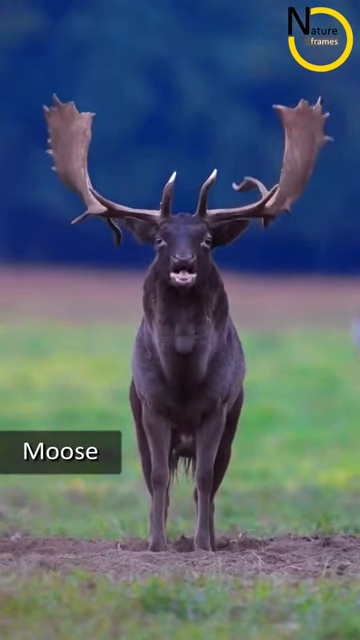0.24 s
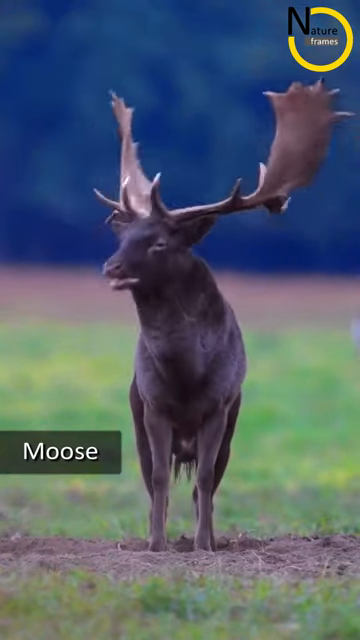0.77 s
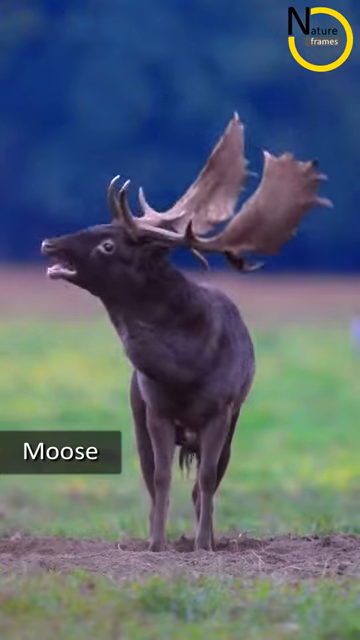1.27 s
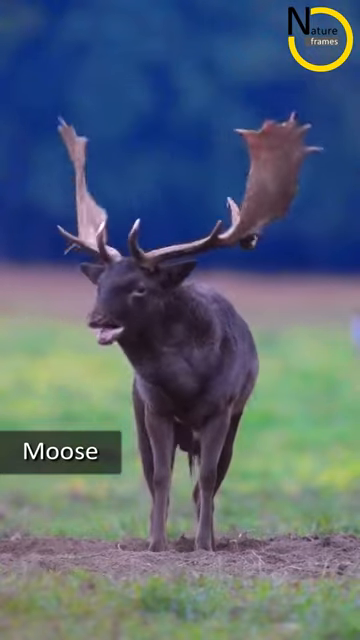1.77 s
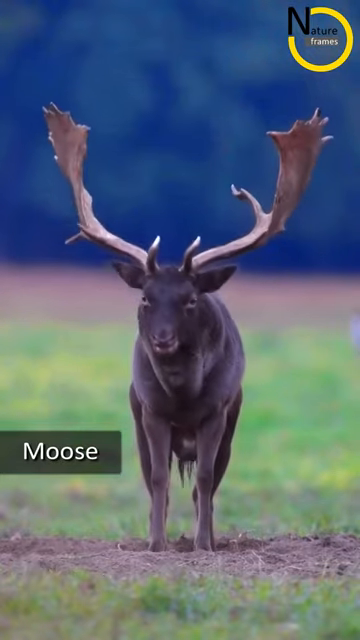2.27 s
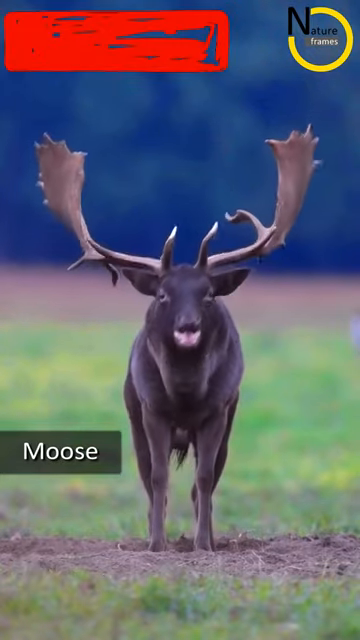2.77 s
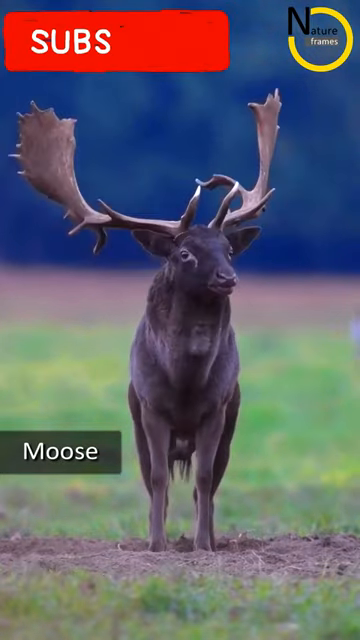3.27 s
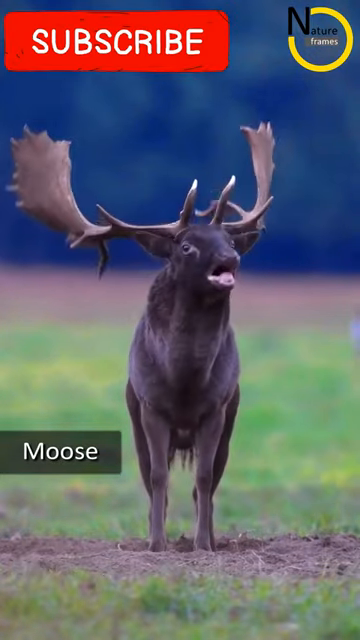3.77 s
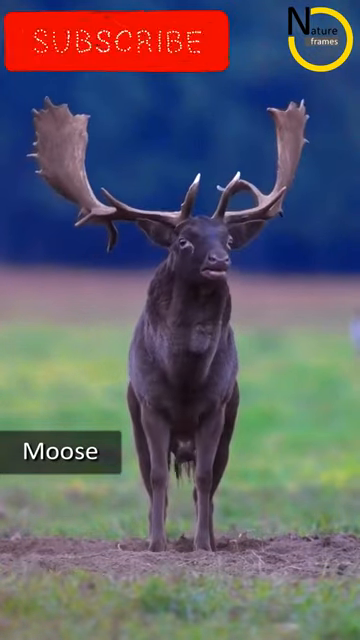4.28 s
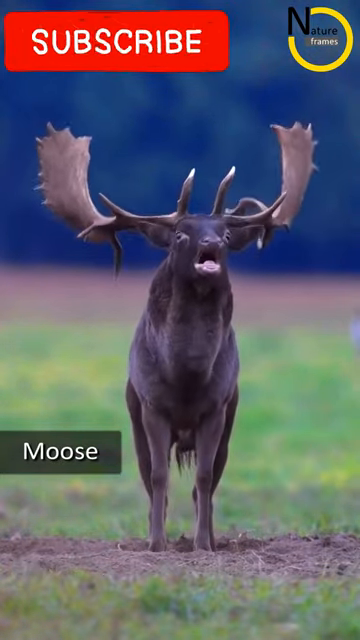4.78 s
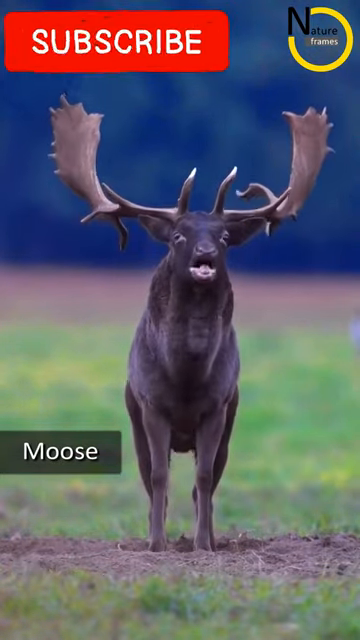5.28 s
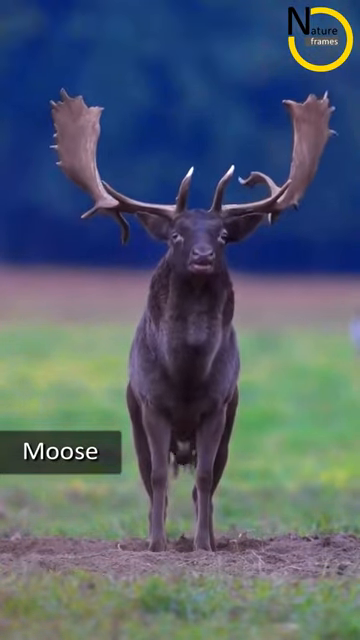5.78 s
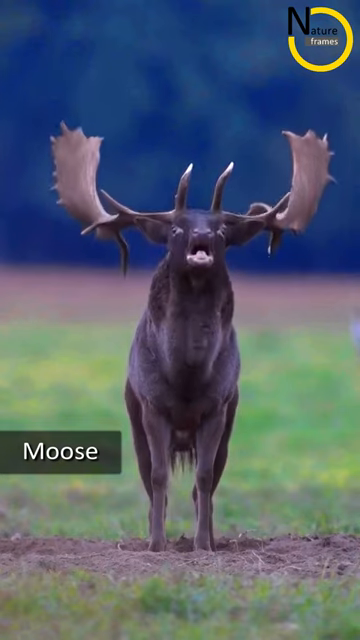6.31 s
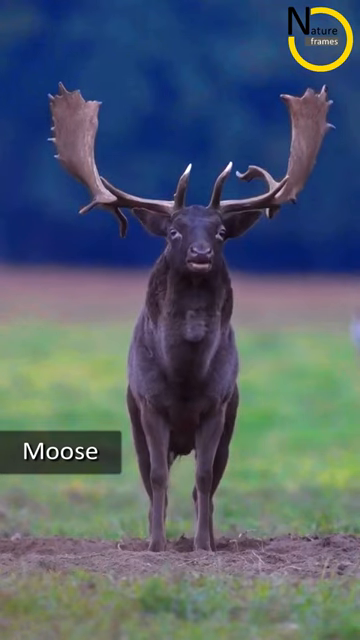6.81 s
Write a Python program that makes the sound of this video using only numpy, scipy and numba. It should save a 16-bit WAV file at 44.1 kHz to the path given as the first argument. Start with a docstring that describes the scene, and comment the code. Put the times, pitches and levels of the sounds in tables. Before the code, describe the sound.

A rutting fallow buck gives rapid, hoarse, belching groans, low and rattling, with raspy air puffs and dull field echoes over a faint rural hush.

```python
"""A rutting buck groans again and again, some way off in an open field, over a quiet rural hush.
Slack vocal folds slap shut about thirty times a second and ring a long throat, mouth and chest.
A rasp and a hiss of air, made from noise in puffs, follow the slaps.
Ground and a far line of trees return the calls as fading, duller noise-like echoes."""
import sys
import numpy as np
from scipy import signal
from scipy.fft import rfft, irfft
from scipy.io import wavfile
from scipy.ndimage import uniform_filter1d
from numba import njit

SR = 44100
rng = np.random.default_rng(int(sys.argv[2]) if len(sys.argv) > 2 else 0)


def int16_out(signal):
    """Quantize to a 16-bit WAV file."""
    q = np.round(np.clip(np.atleast_2d(signal).T, -1, 1) * 32767)
    wavfile.write(sys.argv[1], SR, q.astype(np.int16))


N = 310905
TIME = np.arange(N) / SR
PUFF_PEAK_S = .004  # a puff of air peaks this long after its slap

# Slaps set at given moments, some cracking harder or softer: (crack t/s, extra crack level/dB)
CRACKS = [(0.078, 0), (.135, -8), (0.165, -16), (0.34, -20), (.455, 9), (0.481, -1.5), (.504, 9),
          (0.713, -3), (0.734, -8.5), (0.764, 17), (1.132, -4), (1.94, 10.5), (1.967, 8.5), (2.472, -11.5),
          (2.721, 8), (2.801, 10), (2.839, 13), (2.909, 9.5), (2.933, -7), (2.993, 10.5), (3.857, 9),
          (3.942, 0.5), (3.974, 8), (4.152, 12.5), (4.476, 2), (4.511, 9.5), (4.548, 8), (4.595, 13.5),
          (4.633, 10), (4.663, 6.5), (4.696, 18), (4.722, -1.5), (4.773, -5), (4.799, 4.5), (4.821, 2),
          (5.017, 1), (5.452, 16), (5.488, 12.5), (5.52, 1.5), (5.543, 7.5), (5.569, 7), (6.216, 10),
          (6.242, -11), (6.267, 3.5), (6.361, 8), (6.395, 6), (6.456, -6), (6.486, 6)]
# A gush of air that ends the short grunt:
# (t/s, half length/s, extra hiss level/dB, own ring f/Hz, own ring level/dB)
GUSH = (6.275, 0.022, 8, 4700, -4)


def undb(db):
    """Turn decibels into a plain gain."""
    return 10 ** (np.asarray(db) / 20)


def unit(x):
    """Scale a sound to an average (RMS) strength of 1."""
    return x / np.sqrt(np.mean(x ** 2))


@njit
def svf(x, hz, width):
    """State-variable band-pass whose centre and width may move, gain 1 at the centre."""
    y, b, l = np.empty(len(x)), 0., 0.
    for i in range(len(x)):
        g, k = np.tan(np.pi * hz[i] / SR), width[i] / hz[i]
        v = (b + g * (x[i] - l)) / (1 + g * (g + k))
        b, l, y[i] = 2 * v - b, l + 2 * g * v, k * v
    return y


def ring(x, hz, width, skirt=6.2):
    """A hollow space ringing at its own pitch: two band-passes, scaled so that wide rings are not louder."""
    hz, width = hz + np.zeros(N), width + np.zeros(N)
    narrow = svf(x, hz, width)
    return svf(narrow, hz, skirt * width) * np.sqrt(SR / (np.pi * width))


def gush_swell():
    """The gush of air swells and dies along a bell-shaped curve that peaks at 1."""
    return np.exp(-((TIME - GUSH[0]) / GUSH[1]) ** 2)


def fold_slaps():
    """Vocal folds slap shut once a turn: the slaps, their samples, the running cycle, seconds since a slap."""
    # Pace of the folds, one curve a stretch of groaning, with a slap at its start: (t/s, pace/slaps per s)
    # (the groan from 1.05 s has one pace curve, but two rows of level, posture and lips)
    pace_curves = [
        [(0.0, 58), (0.018, 52.2), (0.054, 19.1), (0.104, 40.9), (0.199, 25.9), (0.337, 32.2)],
        [(0.377, 17.6), (0.468, 38.5), (0.571, 37.6), (0.826, 42.2), (0.87, 18.8)],
        [(1.061, 28.5), (1.18, 31.1), (1.27, 47.7), (1.3, 35.4), (1.48, 41.2), (1.639, 30.7)],
        [(1.939, 37.7), (2.25, 39.4), (2.306, 31.0)],
        [(2.345, 24.9), (2.449, 35.4), (2.5, 37), (2.527, 5), (2.555, 36), (2.665, 33)],
        [(2.718, 15.5), (2.748, 26.8), (2.827, 25.0), (2.86, 56.3), (2.889, 35.5), (3.005, 36.7), (3.219, 32.7)],
        [(3.52, 25.2), (3.683, 34.4), (3.815, 28.0)],
        [(3.855, 30.0), (3.99, 39.6), (4.109, 27.7), (4.186, 32.8), (4.302, 36.4), (4.43, 29.9)],
        [(4.476, 31.2), (4.59, 20.8), (4.69, 37.8), (4.87, 39.6), (5.02, 20)],
        [(5.395, 53.5), (5.427, 24.2), (5.513, 35.8), (5.686, 42.7), (5.727, 34.5), (5.93, 32.2)],
        [(6.117, 42.2), (6.166, 22.8), (6.221, 36.5), (6.312, 45.3)],
        [(6.359, 26.2), (6.538, 41.6), (6.59, 31.2), (6.78, 21.6)],
    ]
    crack_lag_s = .003  # a crack follows its slap
    slap_at = []
    for curve in pace_curves:
        s, pace = np.transpose(curve)
        t = np.arange(s[0], s[-1] + .01, .001)
        turns = np.cumsum(np.interp(t, s, pace)) * .001
        whole_turns = np.arange(1, int(turns[-1]) + 1)
        slap_at += [s[0], *np.interp(whole_turns, turns, t)]
    slap_at = np.array(slap_at)
    # the nearest slap moves to just ahead of each listed crack
    for s, _ in CRACKS:
        slap_at[np.argmin(abs(slap_at - s))] = s - crack_lag_s
    slap_at = np.round(slap_at * SR).astype(int)
    slaps = np.zeros(N)
    slaps[slap_at] = np.sqrt(SR / 33)
    cycle = np.maximum(np.cumsum(slaps > 0) - 1, 0)
    since = np.maximum(TIME - slap_at[cycle] / SR, 0)
    return slaps, slap_at, cycle, since


def groan_controls():
    """Effort, posture and lips of the running stretch set levels, ring pitches, throat width and hoarseness."""
    # One curve a stretch of groaning; the groan from 1.05 s is split into two stretches:
    # (t/s, effort level/dB, second ring level against effort/dB,
    # rasp level of the open mouth against effort/dB)
    groans = [
        [(0.0, -30.5, 10, -21), (0.055, -29.5, -5, -16.5), (0.114, -32, -50, -16), (0.27, -32.5, 0.5, -17.5),
         (0.36, -35, 1.5, -15.5)],
        [(0.37, -27.5, -11.5, -23.5), (0.588, -26.5, 0.5, -7), (0.68, -30.5, 2.5, -10.5), (0.77, -34, 0, -13),
         (0.852, -34, -24, -23.5), (0.89, -49.5, -19, -4.5)],
        [(1.05, -38, -17, -26), (1.198, -29, 5, -17.5), (1.295, -33.5, -2.5, -12.5)],
        [(1.3, -30.5, -5, -14), (1.43, -33, 3.5, -19), (1.614, -34.5, -12.5, -19.5), (1.66, -52.5, -16, -9.5)],
        [(1.93, -31, 7, -24), (2.016, -32.5, 5, -8), (2.304, -37, -4, -22.5), (2.33, -40, -13, -18)],
        [(2.34, -22.5, -37, -22), (2.45, -18.5, -46, -26), (2.51, -21, -31.5, -17), (2.57, -20.5, -32, -20.5),
         (2.64, -29, -34, -19.5), (2.7, -35.5, -18, -4.5)],
        [(2.71, -39.5, -17, -16), (2.78, -35, -29, -17), (2.85, -32, 0.5, -20), (2.96, -26, -6, -16),
         (3.098, -25, -5.5, -19), (3.24, -56.5, -40, -14.5)],
        [(3.5, -45, -5, -23), (3.55, -33.5, -8.5, -19), (3.6, -25.5, -7, -26), (3.69, -25.5, 0, -23),
         (3.76, -29, -18, -24), (3.84, -67, -24, -2.5)],
        [(3.85, -30.5, -1, -19), (3.94, -33.5, -2.5, -13.5), (3.99, -26.5, 0, -15.5), (4.1, -36, -10.5, -9),
         (4.17, -27, 2.5, -25.5), (4.26, -37.5, -4.5, -23), (4.39, -31, -4, -19.5), (4.465, -39, 6.5, -11)],
        [(4.47, -27, 2, -26), (4.54, -33.5, -21, -24.5), (4.66, -30, -28, -22.5), (4.71, -28.5, 0.5, -19),
         (4.767, -30.5, -3, -11.5), (4.86, -23.5, -7.5, -20), (4.927, -27.5, -7, -16),
         (5.045, -44.5, -19, -17.5)],
        [(5.385, -45, 5, -26), (5.495, -26, -6, -18.5), (5.6, -28, -3.5, -13), (5.713, -29, -10.5, -20.5),
         (5.85, -38.5, -21, -17), (5.95, -55.5, -36, -24)],
        [(6.1, -43.5, -21, -34), (6.212, -27, -0.5, -22), (6.258, -25.5, 0, -20), (6.285, -33, -11, -15),
         (6.34, -45, -20, -7.5)],
        [(6.35, -27, -4.5, -22), (6.504, -31, -0.5, -12), (6.676, -33.5, -15, -18), (6.8, -51, -37, -19.5)],
    ]
    # Posture of each stretch: (throat f/Hz, throat width at the start/Hz, second ring f at the start/Hz,
    # its sag/Hz, third ring f at the start/Hz, its level at the start and full effort/dB,
    # mouth f at the start/Hz, its sag/Hz, mouth level against effort before the rasp's share/dB,
    # hiss level against effort once built up/dB)
    postures = [(198, 26, 381.5, 2.7, 740, -49.5, 1180, 41, -7, -22),
                (220.5, 34.6, 420, 160, 735, -50, 1106, 83, -8, -27),
                (196, 39, 409, 44, 720, -45.5, 1156, 58, -7.5, -26.5),
                (202, 54, 381, 29, 410, -58, 1127, 46, -11.5, -24.5),
                (198, 53, 389, 200, 550, -60.5, 1165, 92, -7.5, -22),
                (270.7, 24, 510, 15, 880, -44, 1252, 380, -7.5, -28),
                (210, 39, 391, 21, 830, -43, 1166, 58, -6.5, -26),
                (222.4, 32, 395, 290, 564, -51, 1103, 87, -11.5, -28.5),
                (213, 39, 412, 24, 670, -49.5, 1160, 123, -9.5, -28),
                (215, 32, 410, 8.2, 760, -50.5, 1187, 120, -6.5, -27),
                (228, 29.4, 393.4, 13, 670, -47.5, 1162, 126, -8.5, -28.5),
                (198, 43, 385, 9.5, 617, -50, 1240, 150, -4, -24.5),
                (217, 37, 400, 47, 570, -45, 1100, 43, -7, -28.5)]
    # Lips of each stretch: (share left of the puffs, share left of the hoarseness,
    # factor on the rasp rings' f, extra level of the top rasp rings/dB, chest level/dB)
    lips = [(0.75, 0.84, 1.036, -1, 1), (0.84, 0.86, 0.99, -1.5, -0.5), (1, 1, 0.982, 0, 0),
            (0.47, 0.99, 0.975, -2.5, -3.5), (0.52, 1, 1.02, 0.5, 1.5), (0.39, 0.047, 0.963, -6, -3.5),
            (0.67, 0.73, 1.048, 2, 0), (0.29, 0.94, 0.957, 0.5, -3), (0.84, 1, 0.997, -1, 0),
            (0.86, 0.91, 1.022, 2, 0), (0.78, 1, 1.02, 1.5, 2), (0.97, 0.56, 0.98, -0.5, -1.5),
            (1, 1, 1.003, 2, -1.5)]
    rows = np.vstack(groans)
    start, end = np.array([(run[0][0], run[-1][0]) for run in groans]).T
    stretch = np.maximum(np.searchsorted(start, TIME) - 1, 0)
    age = TIME - start[stretch]
    done = np.clip(age / (end - start)[stretch], 0, 1)
    effort_db, second_db, rasp_db = (np.interp(TIME, rows[:, 0], c) for c in rows[:, 1:].T)
    (throat_hz, throat_width, second_hz, second_sag_hz, third_hz, third_db,
     mouth_hz, mouth_sag_hz, mouth_db, hiss_db) = np.array(postures)[stretch].T

    # the third ring fades by dB per s; below its full effort it weakens with the effort
    third_fade, third_full_db = -34, -29.5
    third_db = third_db + third_fade * age - np.maximum(effort_db, third_full_db)
    mouth_db = mouth_db + 0.54 * rasp_db  # the mouth ring opens with the rasp (dB per dB)
    # the hiss needs a moment to build
    late_db, rise_s = -8.5, 0.045
    hiss_db = hiss_db + late_db * np.exp(-age / rise_s) + GUSH[2] * gush_swell()
    share_db = (second_db, third_db, mouth_db, rasp_db, hiss_db)

    # second and mouth rings sink while the larynx is pulled down; the third drifts to its resting pitch
    second_hz = second_hz - second_sag_hz * done ** 2.1
    third_rest_hz, third_drift_s = 502.3, 0.1255
    third_hz = third_rest_hz + (third_hz - third_rest_hz) * np.exp(-age / third_drift_s)
    ring_hz = (throat_hz, second_hz, third_hz, mouth_hz - mouth_sag_hz * done)
    throat_width = throat_width * (1 + 0.15 * done)  # widens up to the end of a stretch

    # the voice turns hoarse as the rasp grows from one level to the other
    clear_db, hoarse_db, hoarsest = -61.5, -43, 0.76
    hoarse = hoarsest * np.clip((effort_db + rasp_db - clear_db) / (hoarse_db - clear_db), .03, 1)
    puff_share, hoarse_share, rasp_scale, top_db, chest_db = np.array(lips)[stretch].T
    hoarse = np.clip(hoarse * hoarse_share, 0, .9)
    mouth_shape = (puff_share, rasp_scale, top_db, chest_db)
    return mouth_shape, done < 1, effort_db, share_db, ring_hz, throat_width, hoarse


def air_jets(slaps, slap_at, cycle, puff_share, hoarse):
    """Air spurts around each closing as shaped noise; a hoarse voice also leaks between the slaps."""
    crack_low = 0.54  # share of a crack's extra dB that reaches below the top rasp rings
    early = int(PUFF_PEAK_S * SR)
    cycle_db = np.zeros(len(slap_at))
    crack_at = [int((s + 2 * PUFF_PEAK_S) * SR) for s, _ in CRACKS]
    cycle_db[cycle[crack_at]] = [db for _, db in CRACKS]
    crack_db = cycle_db[np.roll(cycle, -early)]
    window = np.hanning(int(4 * PUFF_PEAK_S * SR)) ** 2
    puff = np.roll(signal.fftconvolve(slaps > 0, window)[:N], -early)
    puff *= puff_share  # nearly shut lips hold the puffs back
    spurts = undb(6.93 * unit(uniform_filter1d(rng.standard_normal(N), int(0.0021 * SR))))
    jet = rng.standard_normal(N)
    leak = 0.42 * hoarse * spurts + 0.25
    air = (puff * undb(crack_low * crack_db) * spurts ** 0.51 + leak) * jet
    top_air = (puff * undb(crack_db) * spurts ** 0.51 + leak) * jet
    strength = np.std(air)
    thin_puff = 0.35 * puff * undb(crack_low * crack_db)
    thin_air = unit((thin_puff + 0.33 * hoarse + 0.094) * rng.standard_normal(N))
    return air / strength, top_air / strength, thin_air


def rasp_rings(rasp, air, top_air, cycle, wobble, scale, top_db):
    """Puffs of air ring small spaces; lips and tongue shift, so every puff has its own colour."""
    # Rasp rings before the lips' changes: (f/Hz, width/Hz, level/dB)
    rasp_table = [(1502, 420, -14.5), (2030, 565, -1.5), (2325, 140, -9), (2905, 420, -3.5),
                  (3189, 553, 2.5), (3637, 270, -4.5), (4460, 730, -13.5)]
    top_hz, pitch_stray = 2600, .04  # rings above top_hz answer to the lips; share of pitch
    total = np.zeros(N)
    for hz, width, db in rasp_table:
        level_chance, pitch_chance = rng.standard_normal((cycle[-1] + 1, 2))[cycle].T
        is_top = hz > top_hz
        jet = top_air if is_top else air
        level = undb(db + 1.6 * level_chance + top_db * is_top)
        moving_hz = hz * (wobble + pitch_stray * pitch_chance) * scale
        total += ring(rasp * jet * level, moving_hz, width, skirt=0.58)
    return total


def breath_hiss(hiss, thin_air):
    """Thin air hisses through broad high rings, with one more ring for the gush."""
    # Hiss rings: (f/Hz, width/Hz, level/dB)
    hiss_table = [(4630, 1500, -6.5), (5500, 760, -7), (6440, 500, -9), (8270, 2600, -9)]
    gush = undb(GUSH[4]) * gush_swell()
    total = ring(gush * hiss * thin_air, GUSH[3], 600, skirt=1)
    for hz, width, db in hiss_table:
        total += undb(db) * ring(hiss * thin_air, hz, width, skirt=0.56)
    return total


def buck():
    """Slaps and puffs of air drive the rings of throat, mouth and chest."""
    # Chest ring: (f/Hz, width/Hz)
    chest = (143, 132)
    # Ring widths: (second/Hz, third/Hz, mouth/Hz)
    upper_widths = (34.2, 25, 61)
    slaps, slap_at, cycle, since = fold_slaps()
    mouth_shape, on, effort_db, share_db, ring_hz, throat_width, hoarse = groan_controls()
    puff_share, rasp_scale, top_db, chest_db = mouth_shape
    chance = rng.standard_normal((len(slap_at), 4))[cycle].T
    effort_chance, wobble_chance, third_level_chance, third_pitch_chance = chance

    # levels a moment after a slap hold for its whole cycle
    held = np.minimum(slap_at[cycle] + int(0.019 * SR), N - 1)
    effort = on[held] * on * undb(effort_db[held] + effort_chance)
    second, third, mouth, rasp, hiss = (effort * undb(db[held]) for db in share_db)

    # part of the hoarseness reaches the low rings as noise that dies away after each slap
    low_hoarse = .36 * hoarse
    low_air = np.sqrt(low_hoarse) * unit(np.exp(-since / 0.04) * rng.standard_normal(N))
    low = np.sqrt(1 - low_hoarse) * slaps + low_air
    # soft flesh pushes for a moment, which spares the throat ring a click
    push = signal.fftconvolve(low, np.hanning(int(.002 * SR)) / (.001 * SR))[:N]
    air, top_air, thin_air = air_jets(slaps, slap_at, cycle, puff_share, hoarse)
    smooth = int(2 * PUFF_PEAK_S * SR)
    mouth, rasp, hiss = (uniform_filter1d(level, smooth) for level in (mouth, rasp, hiss))

    # pitches stray from slap to slap, more so in a hoarse voice
    wobble = 1 + (.008 + .018 * hoarse) * wobble_chance
    throat_hz, second_hz, third_hz, mouth_hz = ring_hz
    third_hz = third_hz * (1 + .04 * (.5 + hoarse) * third_pitch_chance)
    third_scatter = undb(4 * third_level_chance)
    second_width, third_width, mouth_width = upper_widths
    # a smaller skirt makes the throat ring build more slowly after a slap
    voice = ring(effort * push, throat_hz * wobble, throat_width, skirt=3.1)
    voice += ring(-second * push, second_hz * wobble, second_width, skirt=6.4)
    voice += ring(third * third_scatter * low, third_hz * wobble, third_width, skirt=6.4)
    voice += ring(-mouth * (0.34 * low + 0.69 * air), mouth_hz * wobble, mouth_width, skirt=6.4)
    thump = low_air + 0.35 * push  # a share of each push thumps in the chest
    voice += ring(undb(chest_db) * effort * thump, *chest, skirt=1.2)
    voice += rasp_rings(rasp, air, top_air, cycle, wobble, rasp_scale, top_db)
    return voice + breath_hiss(hiss, thin_air)


def field(voice):
    """The direct sound plus a scattered, dull return from ground and trees, made by fading noise."""
    t60_s, trees_db, dull_hz = 0.7, -17.5, 2610  # time to fade by 60 dB, level, treble limit
    t = TIME[:SR]
    scatter = rng.standard_normal(SR) * undb(-60 * t / t60_s) * np.minimum(t / 0.028, 1)
    scatter = signal.lfilter(*signal.butter(1, dull_hz, fs=SR), scatter)
    scatter /= np.sqrt(np.sum(scatter ** 2))
    trees = signal.fftconvolve(voice, scatter)[:N]
    return voice + undb(trees_db) * trees


def hush():
    """Distant, steady air of the countryside: noise shaped by a fixed spectrum."""
    # Shape of the spectrum before the overall level is set: (f/Hz, relative level/dB)
    hush_table = [(15, -53), (25, -9), (101, 4.5), (204, 1.5), (322, -17), (509, -10), (920, -22),
                  (1080, -12.5), (1530, -21), (3170, -26.5), (15500, -42.5)]
    hush_db = -50.5
    hz, db = np.transpose(hush_table)
    bins = np.arange(N // 2 + 1) * SR / N + 1  # 1 Hz up, so that the logarithm exists
    shape = undb(np.interp(np.log(bins), np.log(hz), db))
    return undb(hush_db) * unit(irfft(rfft(rng.standard_normal(N)) * shape, N))


def scene():
    """The buck in the field, and the hush around it, in one channel."""
    return (field(buck()) + hush())[None]


def record(dry):
    """The microphone loses the deepest bass and the recorder cuts the top."""
    bass_hz, top_hz = 70, 15700
    thin = signal.sosfilt(signal.butter(2, bass_hz, "high", fs=SR, output="sos"), dry)
    return signal.sosfilt(signal.ellip(12, .2, 80, top_hz, fs=SR, output="sos"), thin)


dry = scene()
out = record(dry)
int16_out(out)
```